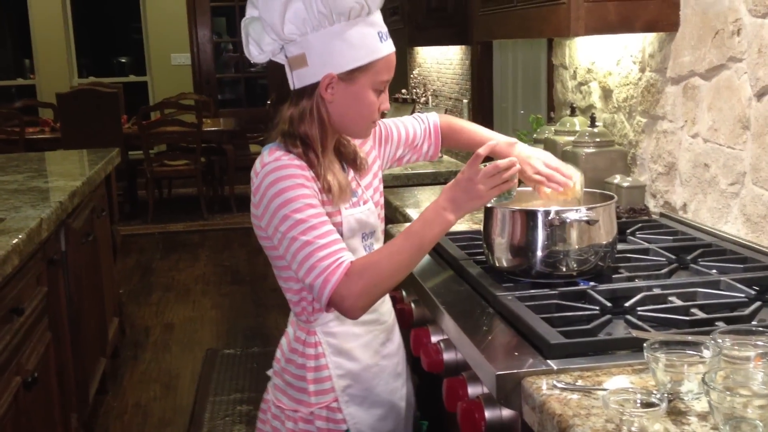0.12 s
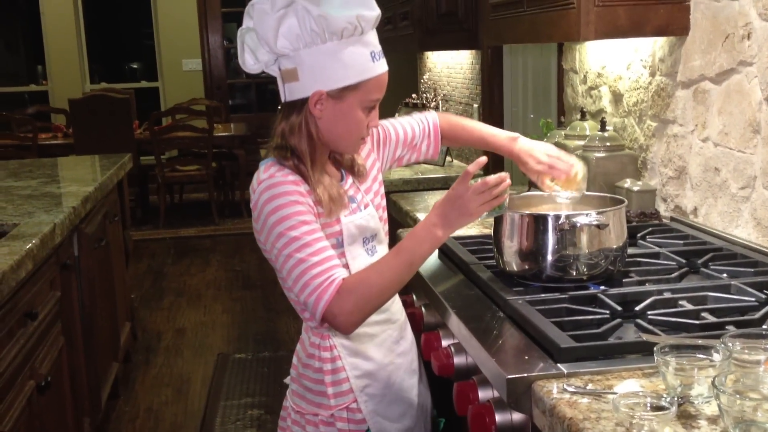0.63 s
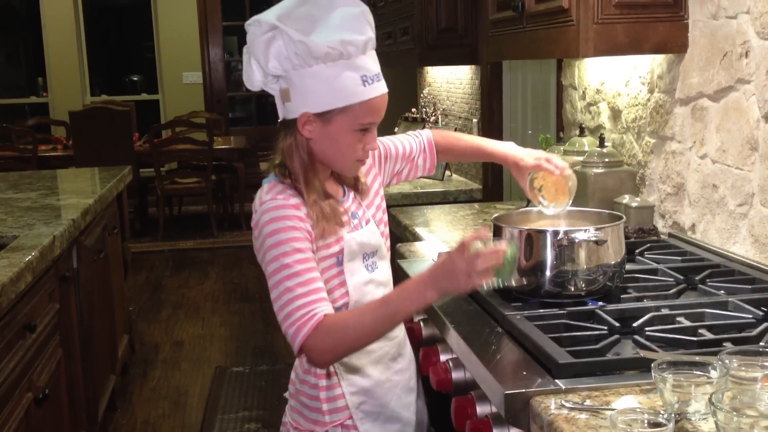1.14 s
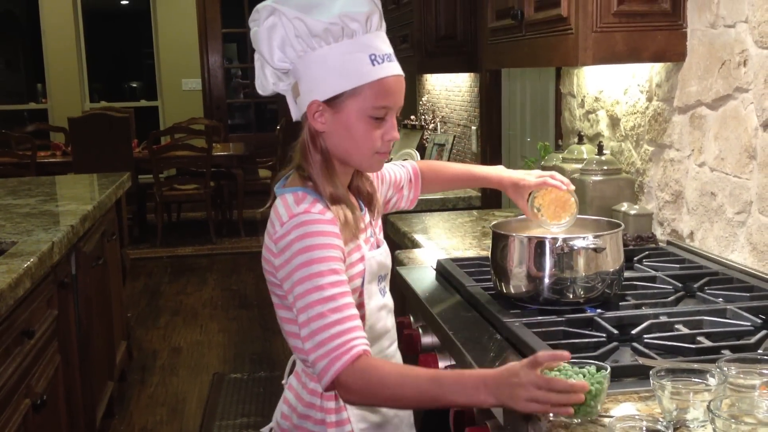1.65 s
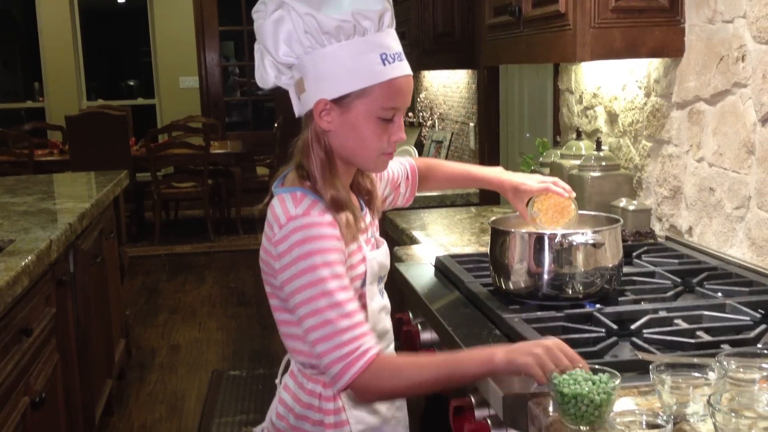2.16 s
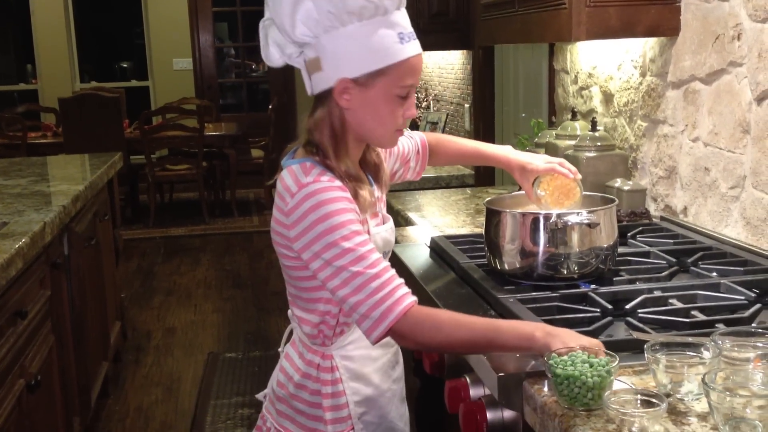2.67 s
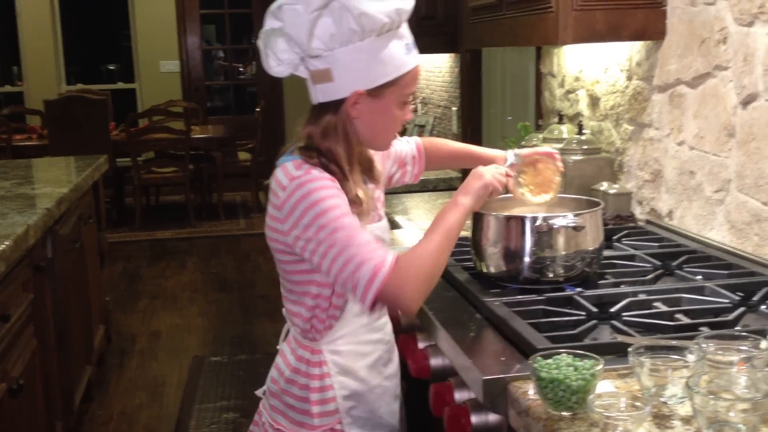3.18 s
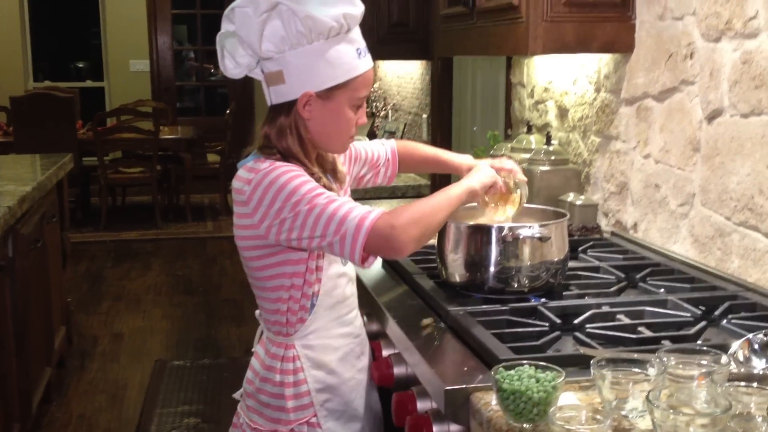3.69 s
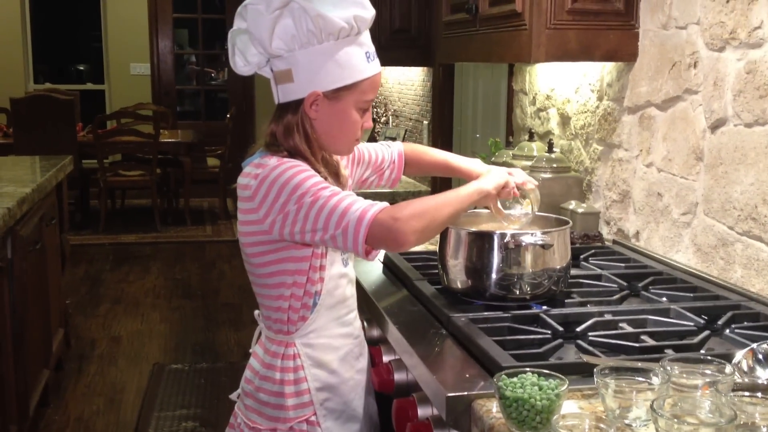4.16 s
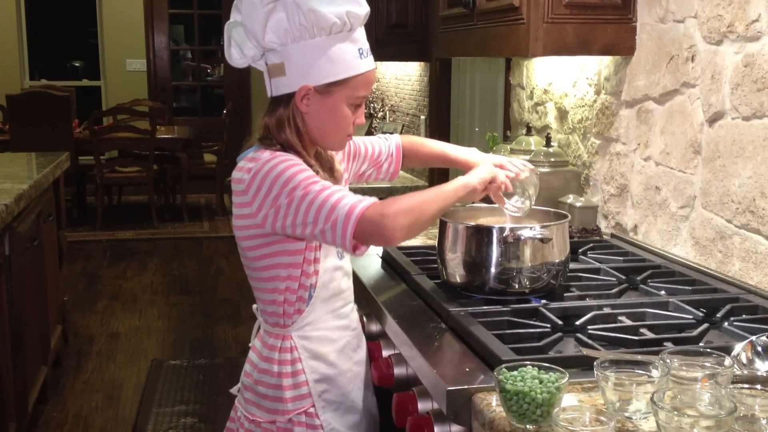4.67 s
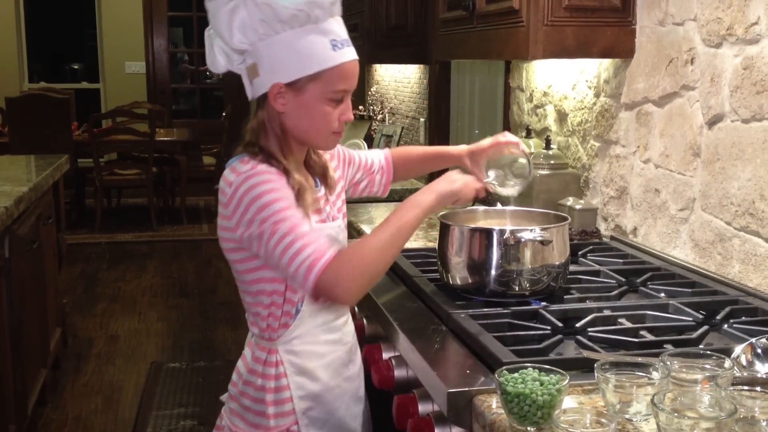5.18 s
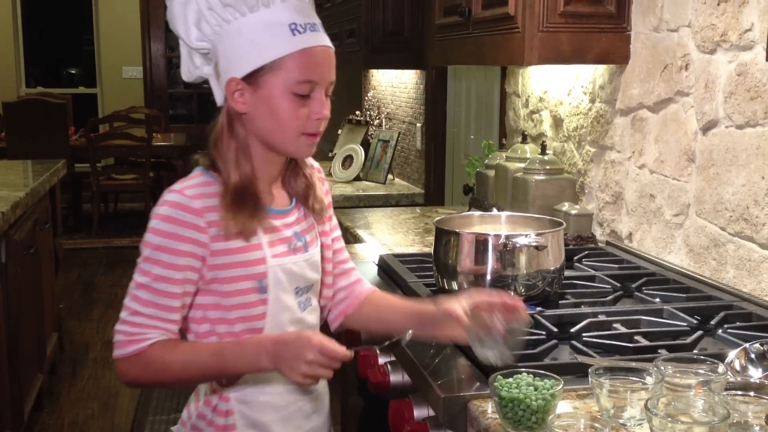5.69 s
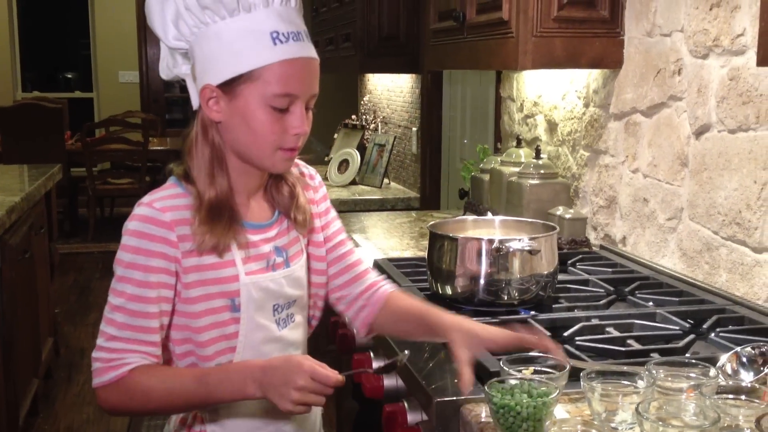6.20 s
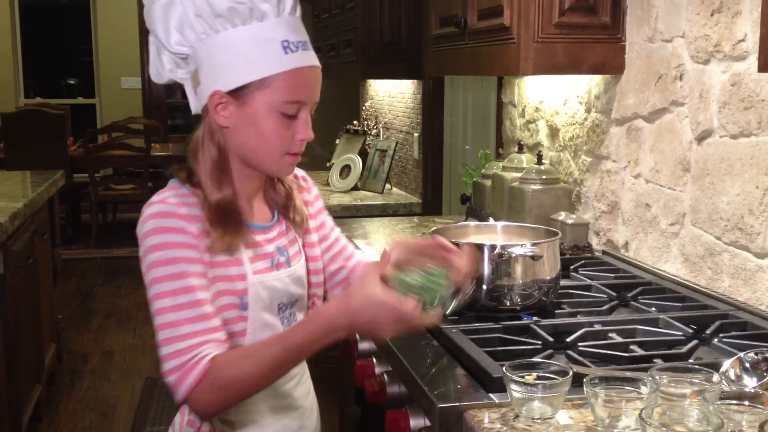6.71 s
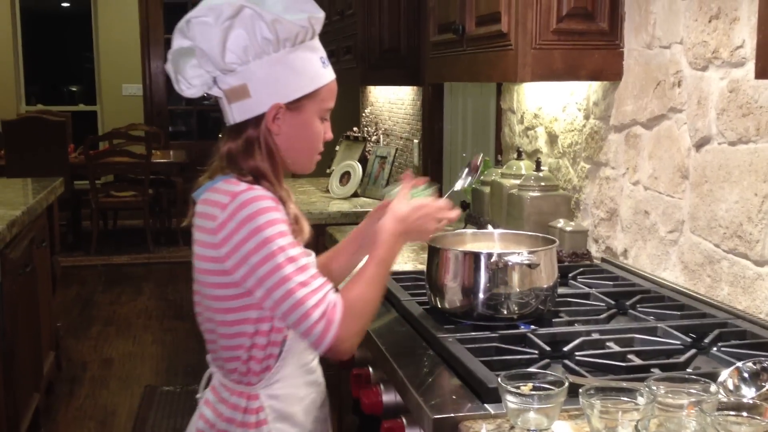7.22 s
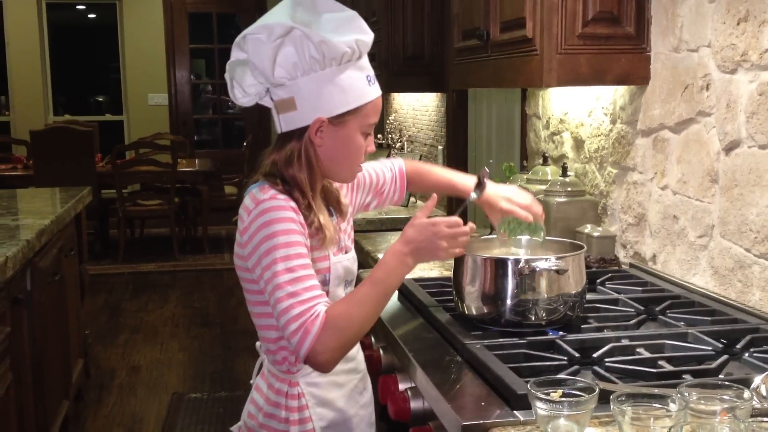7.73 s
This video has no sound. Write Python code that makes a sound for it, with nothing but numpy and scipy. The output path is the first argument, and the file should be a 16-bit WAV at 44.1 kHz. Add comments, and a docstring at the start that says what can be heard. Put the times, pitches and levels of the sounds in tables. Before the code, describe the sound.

Close, thin-sounding microphone in a hard-surfaced kitchen. Appliance noise whirs quietly throughout. Glass bowls knock and ring briefly on a stone counter, a hand damping them. Diced vegetables spill in a short crackling surge, a spoon clicks and scrapes against bowl and steel pot, then glass lands with several bright clunks. After a pause, peas pour in a short dry rattle.

```python
"""A low appliance hum runs throughout; diced vegetables rattle in surges, and peas near the end,
among small glass bowls set down on a stone counter and clinked, and a spoon scraping over a steel pot.
Hum is shaped noise, rattle a hail of ticks, each blow a banded impulse and each ring a set of dying sines.
A live kitchen throws knocks, rings and rattle back as early echoes and a diffuse tail."""
import sys
import numpy as np
from scipy import signal
from scipy.fft import rfft, irfft
from scipy.io import wavfile
from scipy.ndimage import uniform_filter1d

SR = 44100
rng = np.random.default_rng(int(sys.argv[2]) if len(sys.argv) > 2 else 0)


def rack_gain(trim_db):
    """Turn a fader trim in dB into the linear factor to multiply a signal by."""
    fader = np.asarray(trim_db, float)
    return 10 ** (fader / 20)


def wrap_up_sound(samples):
    """Save the sound to the file named by the first command line argument, as 16-bit audio."""
    columns = np.atleast_2d(samples).T
    # keep every value between -1 and 1, then stretch to whole-number steps
    tamed = np.clip(columns, -1, 1)
    steps = np.round(tamed * 32767).astype(np.int16)
    wavfile.write(sys.argv[1], SR, steps)


N = 346185  # length in samples

# spectrum of the appliance and burner noise, before its whirring bands: f/Hz, level per Hz/dB
HUM_SPECTRUM = [(30, 4), (60, -17.5), (100, -12), (170, 2), (300, -11), (600, -13.5), (1100, -23.5),
                (2400, -24), (3700, -22), (5200, -15.5), (6600, -24.5), (8500, -32), (13000, -31),
                (16000, -26.5)]
# broad whirring bands lifted out of the hum: f/Hz, width/Hz, lift/dB
WHIRR_BANDS = [(132.5, 13, 3), (2042, 270, 12.5), (3065, 430, 10), (5540, 120, 8.5), (7200, 170, 9)]

# vegetables and peas tumbling and the spoon dragging, in surges:
# peak t/s, level/dB, swell/dB per s, fade/dB per s, brightness above 7.2 kHz/dB
RATTLE_SURGES = [(0.002, -54.5, 900, 55, -11), (0.322, -58, 450, 7.5, -8), (0.782, -56, 408, 64, -6.5),
                 (1.249, -69, 60, 200, -8), (3.734, -43.5, 192, 172, -19), (3.8, -52, 902, 1, -12),
                 (3.984, -49.5, 904, 62, -11), (4.144, -59.5, 95, 70, -3.5), (5.1, -75, 304, 110, -3),
                 (5.328, -69.5, 130, 80, -2.5), (5.624, -71.5, 900, 500, -5), (5.75, -66.5, 72, 290, -18),
                 (7.68, -45.5, 119, 40, -10.5)]
# colour of the rattle, relative: f/Hz, level per Hz/dB
RATTLE_SPECTRUM = [(300, -39.5), (600, -15), (1500, -19.5), (2400, -16.5), (3500, -9), (4800, -8),
                   (6100, -9.5), (8000, -17), (13000, -18.5), (15500, -38)]
# resonance near 4.9 kHz, heard in every blow and tick: f/Hz, width/Hz, level/dB
RESONANT_PEAK = (4876, 268, 9.4)

# every blow: t/s, energy of its crack/dB, weight/dB, hardness/dB, reach into the counter/dB
# weight feeds thud, knock and clack, hardness the tick; reach sets the thud against the knock
BLOWS = [(0.3075, -35, -17, -8, -1), (0.7734, -40.5, -8, 6, -1), (1.3884, -52.5, 10, 0, 16),
         (1.399, -28, -1, 2.5, -15), (1.4381, -20, -7.5, -6, -25), (1.6929, -14.5, -14.5, 2, 1),
         (1.8353, -27.5, 18, -14, -8.5), (1.9216, -16.5, 3.5, -18.5, -6), (2.4852, -16.5, -1.5, -22, -7.5),
         (2.5396, -16.5, -11, -8, -7), (2.7092, -7, -10, -4.5, -17), (2.7527, -13.5, -24, -21, -10),
         (2.8246, -30.5, -3, -2, -2), (3.404, -4.5, -27, -8.5, -15), (3.409, -20, -13.5, -10, -13),
         (3.484, -29, -4, 5.5, -17), (3.696, -27.5, -10, -1.5, -10), (3.7217, -26, 4, 5, -13.5),
         (3.8, -28, -3, -22, -12), (3.9848, -20, -15.5, -10, -9), (4.0031, -23, -29, -5, 0.5),
         (4.0387, -24, -27, -22, 2), (4.132, -28, -37.5, -14, 19), (4.2793, -13, -8.5, -8, -19),
         (4.3381, -10.5, -19, -8, -3), (4.473, 0.5, -19.5, -13.5, -40), (4.5525, -9, -23, -33, -29),
         (4.7544, -31, -13, -10, -2), (4.8758, -36.5, -3, 2.5, -8), (4.89, -22.5, -21, -2, -15),
         (5.0604, -43, -1, -5, -9), (5.6206, -51, -15, 0, 14), (5.8412, 0.5, -11, -19.5, -12.5),
         (5.8825, -12.5, -16.5, -23, 6), (5.9053, -17.5, 5, -28, -19), (5.9806, -4, 8.5, -12.5, -22),
         (6.0128, -5.5, 5, -12, -15), (6.0848, -10.5, 3, -15, -9), (6.4181, -46.5, 9, -15, -14),
         (7.685, -27.5, -13, -19, -15), (7.7306, -21, -27, -21, 0)]
# thud, knock, clack, crack and tick of a blow: low f/Hz, high f/Hz, decay time constant/s
BLOW_BANDS = [(130.1, 505, 0.017), (877, 2690, 0.005), (2464, 3755, 0.0011), (4180, 6080, 0.0024),
              (6570, 13600, 0.00092)]

# All strikes: "free" is the time until a hand or the counter damps the ring.
# On the two main glasses the landing place also sets the lowest mode and the tilt one octave above 4.5 kHz.
# empty glass bowl, modes: f/Hz, level/dB, t60/s
EMPTY_GLASS_MODES = [(1927, -11.5, 0.3), (4484, -1, 0.28), (5335, -17, 0.18), (5943, -14.5, 0.3),
                     (7680, -17, 0.36), (8640, -9, .3), (10350, -12, 0.31), (13090, -11, 0.29),
                     (13210, -24, 0.5), (14940, -22, 0.27)]
# its strikes: t/s, level/dB, free/s, lowest mode/dB, tilt/dB
EMPTY_GLASS_HITS = [(1.691, -29, 0.075, -20, 4), (2.541, -28.5, 0.061, -0.5, -5.5),
                    (2.608, -43.5, 0.065, -20, 2.5), (2.709, -29, 0.024, -27, -1.5),
                    (2.754, -28, 0.0064, -11, -12), (2.825, -44.5, 0.077, 4, -2)]
# bowl held in the hand, modes: f/Hz, level/dB, t60/s
HELD_BOWL_MODES = [(1970, -12.5, 0.44), (4815, 4, 0.085), (8610, -4, 0.022), (10570, -14.5, 0.021),
                   (10930, -18.5, .03), (14850, -15, 0.028)]
# its strikes: t/s, level/dB, free/s, lowest mode/dB, tilt/dB
HELD_BOWL_HITS = [(3.404, -29.5, .12, -16, -5), (3.986, -40.5, 0.045, -12, 0), (4.28, -48, 0.017, 8, -8.5),
                  (4.473, -25, 0.028, -4.5, 3.5), (4.89, -45.5, .05, -9, 3), (5.06, -50.5, .15, -13, -21),
                  (5.841, -23, 0.024, 2, -6), (5.905, -30, 0.045, -11.5, -0.5),
                  (5.981, -32, .05, -14, -9.5), (6.012, -24.5, .2, 10, -20), (6.085, -34.5, .1, -8, -23)]
# spoon, modes: f/Hz, level/dB, t60/s
SPOON_MODES = [(3390, 6, 0.064), (4070, -4, .1), (5100, 18.5, 0.019), (6770, 9.5, 0.038), (7289, -5, 0.074),
               (8460, -6, 0.049), (11030, 13.5, 0.017), (11660, 1, 0.033), (13440, -5, .03)]
# its strike: t/s, level/dB, free/s
SPOON_HITS = [(4.339, -37.5, 0.099)]
# steel pot, modes: f/Hz, level/dB, t60/s
POT_MODES = [(1743, -2, 1.9), (2492, -10, 1.5), (2750, 3, 0.72), (2986, -2, 3)]
# its strike: t/s, level/dB, free/s
POT_HITS = [(4.553, -55.5, 0.25)]
# neighbouring glass, modes: f/Hz, level/dB, t60/s
NEIGHBOUR_GLASS_MODES = [(2804, 4, 0.13), (7200, -11, 0.29), (12880, -10, 0.18)]
# its strike: t/s, level/dB, free/s
NEIGHBOUR_GLASS_HITS = [(5.884, -34, .09)]
# air and glass under a bowl meeting the stone, modes: f/Hz, level/dB, t60/s
BOWL_FOOT_MODES = [(1305, -17.5, 0.044), (1304, -6, 0.083), (1381.4, 1.5, 0.064), (1633, -6, .04)]
# its strikes: t/s, level/dB, free/s
BOWL_FOOT_HITS = [(1.834, -33.5, 0.045), (1.922, -33, .055), (2.467, -50.5, .02), (2.488, -35, 0.024),
                  (5.842, -37.5, .03), (5.875, -32, .062), (5.98, -20.5, .077), (6.085, -34.5, .06),
                  (6.419, -48.5, 0.015)]
# bowl of peas, modes: f/Hz, level/dB, t60/s
PEA_BOWL_MODES = [(2762, -9.5, 0.29), (3620, -0.5, 0.33)]
# its strikes: t/s, level/dB, free/s
PEA_BOWL_HITS = [(1.691, -42.5, 0.082), (2.709, -40, .08)]
# slab and cabinet under a heavy landing, modes: f/Hz, level/dB, t60/s
COUNTER_MODES = [(173, 0.063, 0.063), (243, -2.7, 0.046)]
# their strikes: t/s, level/dB, free/s
COUNTER_HITS = [(1.389, -40, .1), (1.692, -44, .1), (5.842, -44.5, .1), (5.98, -32, .1)]
# strength of the beating twin of each mode: f/Hz, level/dB
TWIN_LEVEL = [(3000, -25.5), (5000, -2.5), (9000, -5)]

# decay of the diffuse kitchen tail: f/Hz, t60/s
KITCHEN_DECAY = [(150, 0.58), (400, 0.62), (1040, 0.75), (2760, 0.63), (4400, 0.61), (4850, 0.62),
                 (5400, 0.57), (8000, 0.58), (14000, 0.3)]
# first echoes off walls and hood: t/s, level/dB
EARLY_ECHOES = [(.0035, -14.5), (.0062, -13), (0.0121, -17), (.016, -8.5), (.021, -24.5), (.028, -14)]


def evened(x):
    """Scales to rms 1."""
    return x / np.sqrt(np.mean(x ** 2) + 1e-20)


def read(points, hz):
    """Reads a curve on a log-frequency axis."""
    f, value = np.transpose(points)
    return np.interp(np.log(hz + 1), np.log(f + 1), value)


def add(mix, s, sound):
    """Mixes a sound in at time s."""
    part = mix[round(s * SR):][:len(sound)]
    part += sound[:len(part)]


def band(x, lo_hz, hi_hz):
    """Causal band-pass."""
    return signal.sosfilt(signal.butter(3, [lo_hz, hi_hz], "band", fs=SR, output="sos"), x)


def hum():
    """Appliance and burner noise with broad whirring bands, wavering in patches of time and pitch."""
    level_db, waver_db = -57.5, 1.7  # both rms
    frames, hz = N // 512 + 5, np.fft.rfftfreq(2048, 1 / SR)
    real, imaginary, patches = rng.standard_normal((frames, len(hz), 3)).T
    patches = uniform_filter1d(patches, 16, axis=0)  # neighbouring frequencies waver together
    patches = evened(uniform_filter1d(patches, 8, axis=1))  # and so do neighbouring moments
    whirr_db = sum(db / (1 + (2 * (hz - f) / width) ** 2) for f, width, db in WHIRR_BANDS)
    colour_db = (read(HUM_SPECTRUM, hz) + whirr_db)[:, None]
    spectrum = (real + 1j * imaginary) * rack_gain(colour_db + waver_db * patches)
    noise = signal.istft(spectrum, nperseg=2048, noverlap=1536)[1][:N]
    return rack_gain(level_db) * evened(noise)


def resonant_peak(x):
    """Lifts a resonant peak near 4.9 kHz."""
    hz, width, db = RESONANT_PEAK
    return x + rack_gain(db) * signal.lfilter(*signal.iirpeak(hz, hz / width, SR), x)


def rattle():
    """A dense hail of small ticks of uneven size, coloured by a fixed spectrum and that peak, in surges."""
    ticks_per_s, settle = 2500, 33  # settle in dB per s squared: the fade steepens as pieces come to rest
    size_db = 1.73 * np.minimum(rng.exponential(1, N), 5)
    lands = rng.random(N) < ticks_per_s / SR
    ticks = rng.standard_normal(N) * rack_gain(size_db) * lands
    hz = np.fft.rfftfreq(N, 1 / SR)
    hail = rfft(resonant_peak(ticks)) * rack_gain(read(RATTLE_SPECTRUM, hz))
    bright = hz > 7200
    body = evened(irfft(hail * ~bright, N))
    fizz = evened(irfft(hail * bright, N))
    peak, db, swell, fade, bright_db = np.transpose(RATTLE_SURGES)[:, :, None]
    late = np.arange(N) / SR - peak
    drop_db = np.where(late < 0, -swell * late, fade * late + settle * late ** 2)
    surges_db = db - drop_db
    # the strongest surge of each moment sets the level
    return rack_gain(surges_db.max(0)) * body + rack_gain((surges_db + bright_db).max(0)) * fizz


def knocks():
    """Each blow is a sharp impulse with a short puff of noise, coloured band by band."""
    clack_db, clack_follows = 3, 0.61  # the clack against the crack, and its share of the weight
    out, t = np.zeros(N), np.arange(2048) / SR
    puffs = rng.standard_normal((len(BLOWS), len(t)))
    for (s, crack_db, weight_db, hardness_db, reach_db), puff in zip(BLOWS, puffs):
        impulse = (t == 0) + 0.071 * puff
        thud_db = weight_db + reach_db
        bands_db = (thud_db, weight_db, clack_db + clack_follows * weight_db, 0, hardness_db)
        for (lo_hz, hi_hz, length), db in zip(BLOW_BANDS, bands_db):
            burst = band(impulse * np.exp(-t / length), lo_hz, hi_hz)
            add(out, s, rack_gain(crack_db + db) * burst / np.linalg.norm(burst))
    return resonant_peak(out)


def ring(modes, strikes):
    """Dying sines; the place of the blow tilts the modes, and a touch cuts them short."""
    sharper = 0.0022  # nothing is quite round: each mode beats with a twin this share sharper
    rise_s, touch = 0.0002, 900  # touch: extra decay in dB per s once damped
    out, t = np.zeros(N), np.arange(SR // 2)[:, None] / SR
    hz, db, t60 = np.transpose(modes)
    turn = 2 * np.pi * hz * t
    twin = rack_gain(read(TWIN_LEVEL, hz)) * np.sin(turn * (1 + sharper))
    pair = (np.sin(turn) + twin) * (1 - np.exp(-t / rise_s))
    tilt_shape = np.maximum(np.log2(hz / 4500), 0) ** 2  # square of the octaves above 4.5 kHz
    for s, strike_db, free, *place in strikes:
        low_db, tilt_db = place or (0, 0)
        place_db = low_db * (hz == hz.min()) + tilt_db * tilt_shape
        lost_db = 60 * t / t60 + touch * np.maximum(t - free, 0)
        add(out, s, (rack_gain(strike_db + db + place_db - lost_db) * pair).sum(1))
    return out


def kitchen(x, tail_db):
    """Early echoes, then three diffuse tails taken in turn so that no two blows echo alike."""
    out = x.copy()
    for (s, db), sign in zip(EARLY_ECHOES, (1, -1, -1, 1, -1, 1)):
        add(out, s, sign * rack_gain(db) * x)
    hz, t, z = signal.stft(rng.standard_normal((3, SR)), SR, nperseg=256)
    z = z * rack_gain(-60 * t / read(KITCHEN_DECAY, hz)[:, None])
    tails = signal.istft(z, SR, nperseg=256)[1][:, :SR]
    lag = np.arange(SR) / SR
    near_walls = 1 + 2.3 * np.exp(-lag / 0.0097)  # they answer first and loudest
    tails = tails * np.clip(lag / 0.0025, 0, 1) * near_walls
    tails = tails / np.linalg.norm(tails, axis=1, keepdims=True)
    # the sound circles through the tails 2.9 times a second at constant total power
    turn = 2 * np.pi * (2.9 * np.arange(N) / SR + np.arange(3)[:, None] / 3)
    feeds = np.sqrt(2 / 3) * np.cos(turn) * x
    wet = signal.fftconvolve(feeds, tails, axes=1)[:, :N]
    return out + rack_gain(tail_db) * wet.sum(0)


def scene():
    """Rattle, blows and rings in the kitchen, over the hum."""
    rings = (ring(EMPTY_GLASS_MODES, EMPTY_GLASS_HITS)
             + ring(HELD_BOWL_MODES, HELD_BOWL_HITS)
             + ring(SPOON_MODES, SPOON_HITS)
             + ring(PEA_BOWL_MODES, PEA_BOWL_HITS)
             + ring(POT_MODES, POT_HITS)
             + ring(COUNTER_MODES, COUNTER_HITS)
             + ring(NEIGHBOUR_GLASS_MODES, NEIGHBOUR_GLASS_HITS)
             + ring(BOWL_FOOT_MODES, BOWL_FOOT_HITS))
    room = kitchen(rattle(), tail_db=0.5) + kitchen(knocks(), tail_db=4.0) + kitchen(rings, tail_db=1.5)
    room = band(room, 133, 0.45 * SR)  # small things radiate little below 133 Hz
    return (room + hum())[None]


def top_cut(x):
    """Nothing passes above the cut-off."""
    return signal.sosfilt(signal.butter(12, 16610, fs=SR, output="sos"), x)


def record(dry):
    """A small microphone with no deep bass and no top treble."""
    thin = signal.sosfilt(signal.butter(4, 100, "high", fs=SR, output="sos"), dry)
    treble_cut = signal.firwin(255, 15350, window=("kaiser", 4), fs=SR)
    mix = signal.oaconvolve(thin, treble_cut[None], "same")
    return top_cut(mix)


dry = scene()
out = record(dry)
wrap_up_sound(out)
```